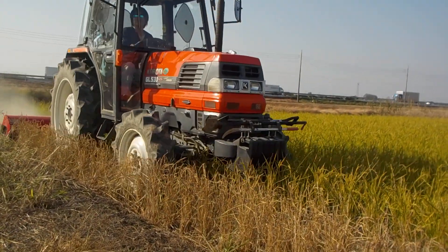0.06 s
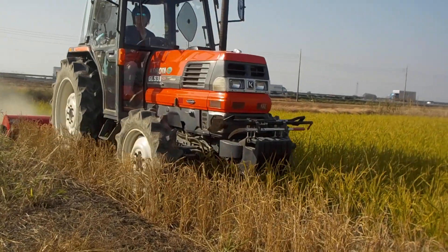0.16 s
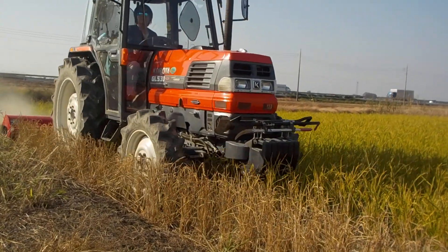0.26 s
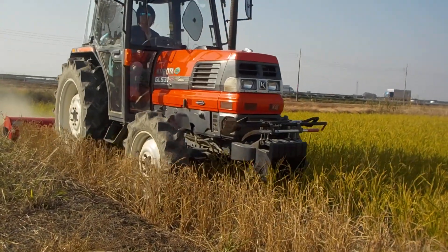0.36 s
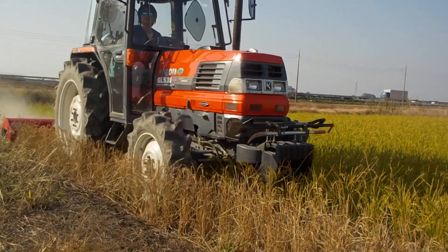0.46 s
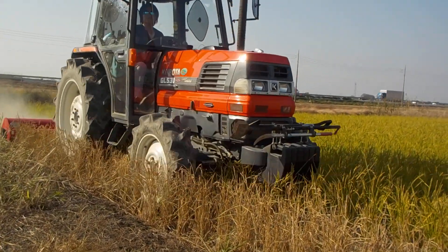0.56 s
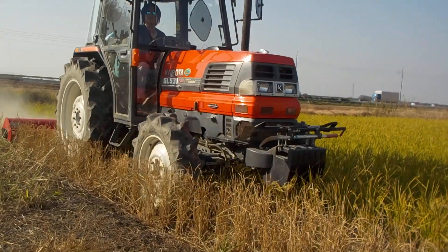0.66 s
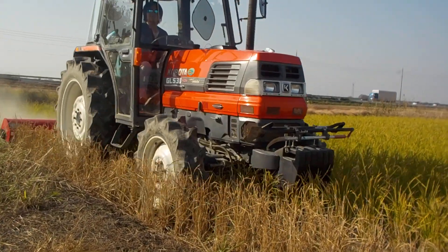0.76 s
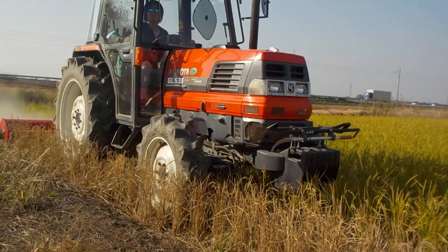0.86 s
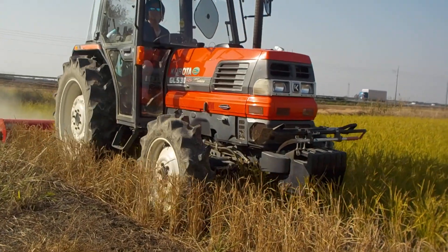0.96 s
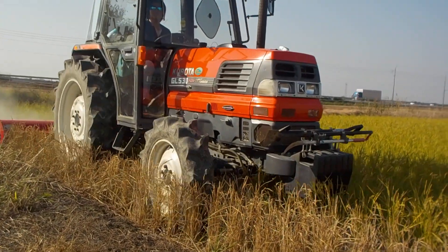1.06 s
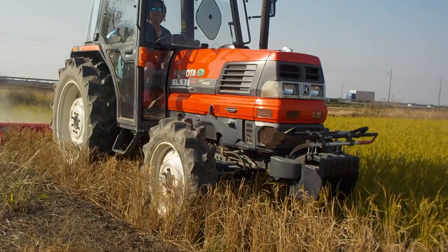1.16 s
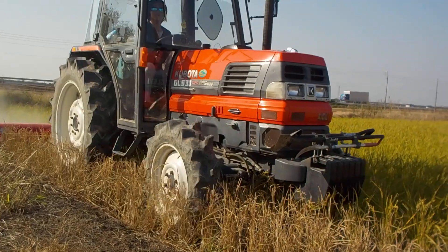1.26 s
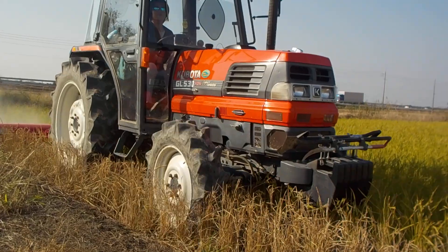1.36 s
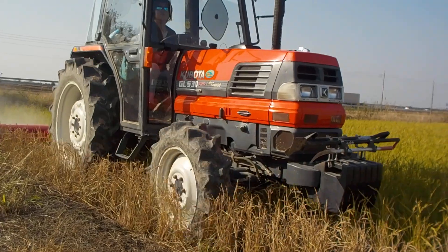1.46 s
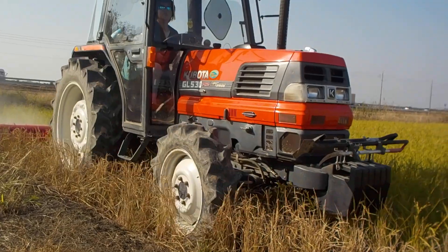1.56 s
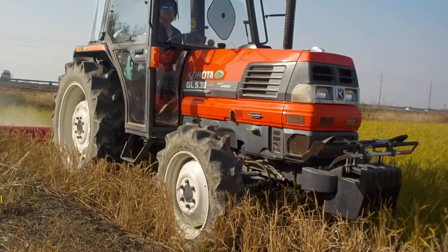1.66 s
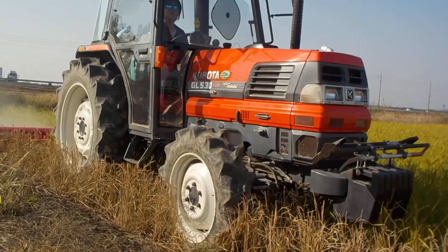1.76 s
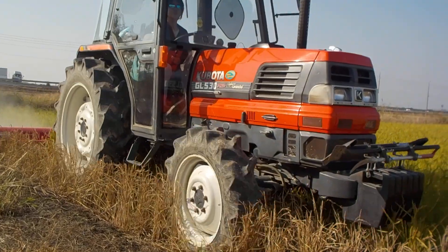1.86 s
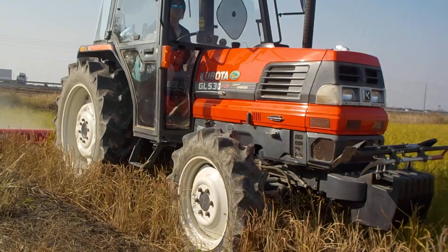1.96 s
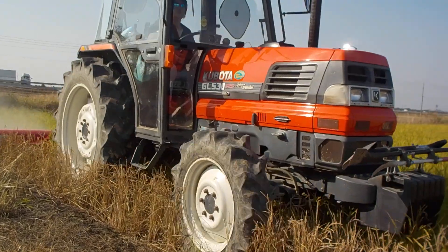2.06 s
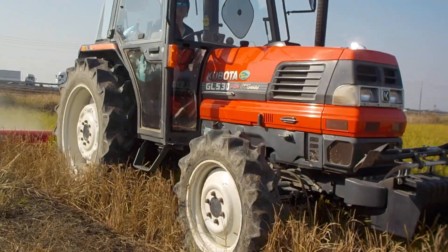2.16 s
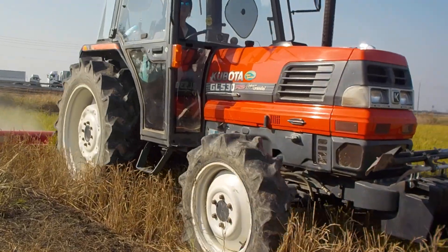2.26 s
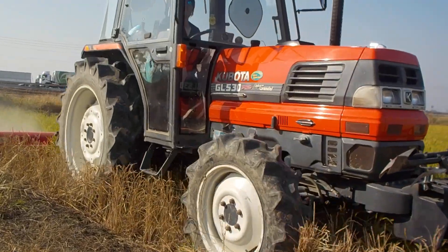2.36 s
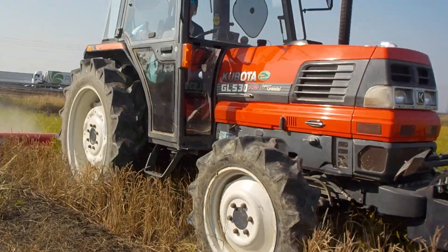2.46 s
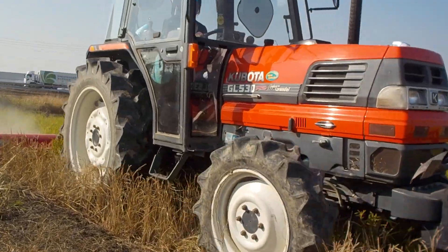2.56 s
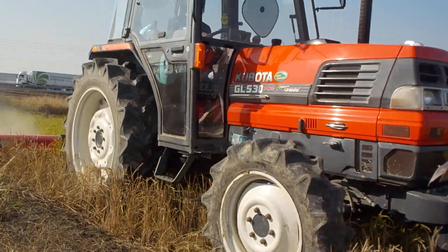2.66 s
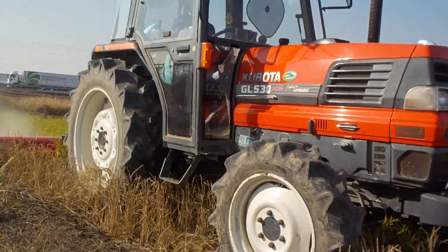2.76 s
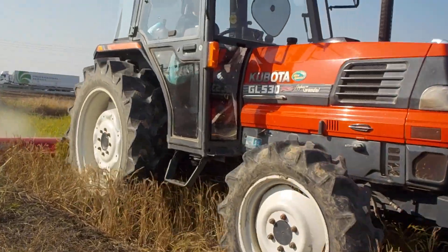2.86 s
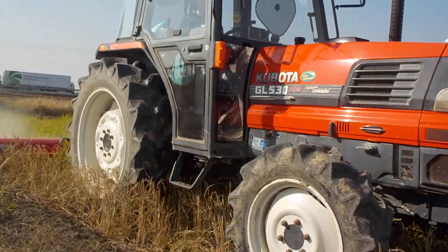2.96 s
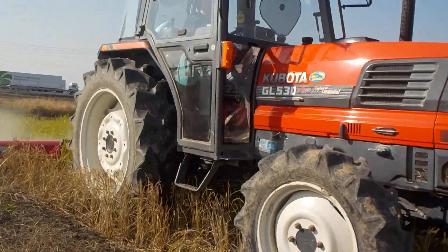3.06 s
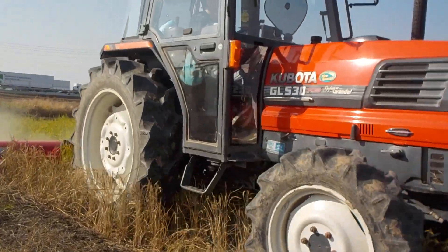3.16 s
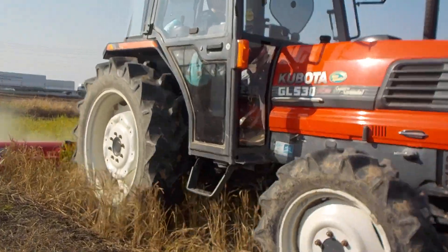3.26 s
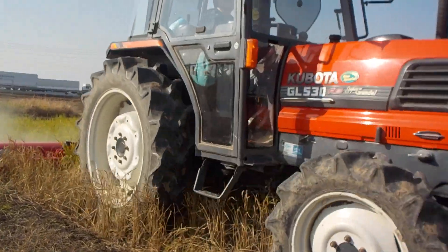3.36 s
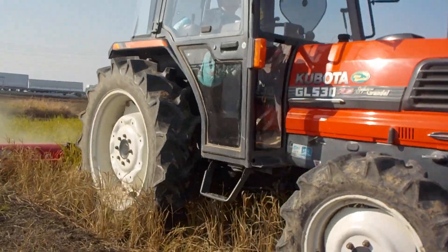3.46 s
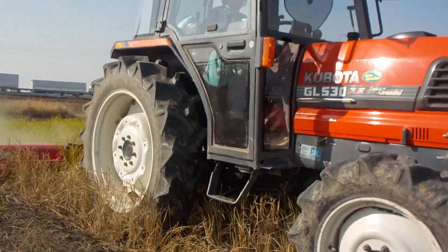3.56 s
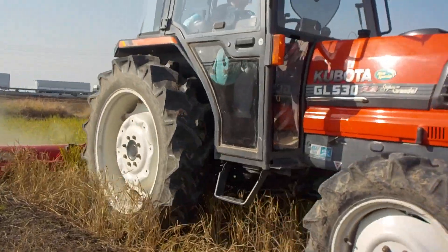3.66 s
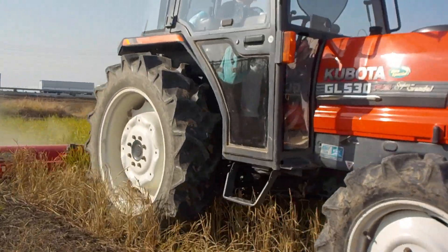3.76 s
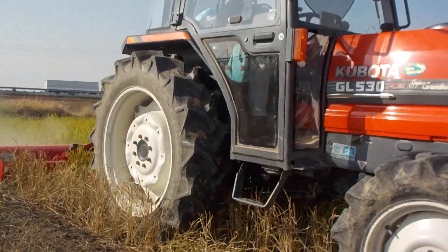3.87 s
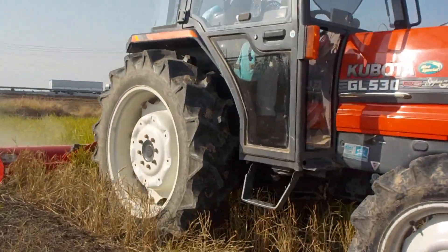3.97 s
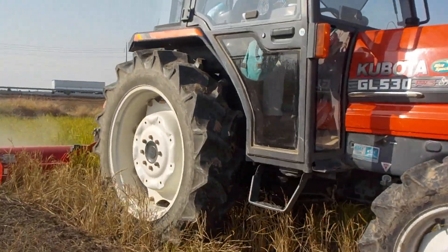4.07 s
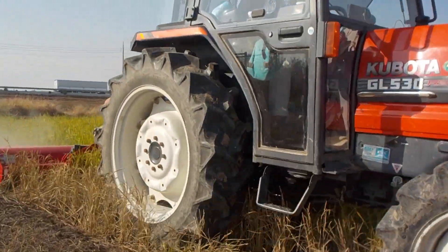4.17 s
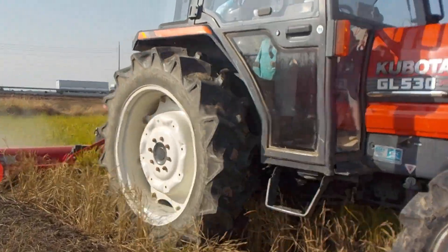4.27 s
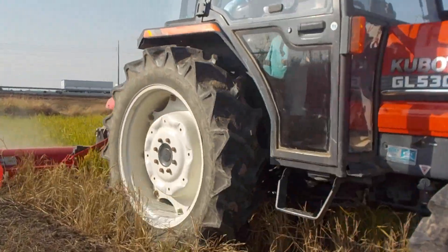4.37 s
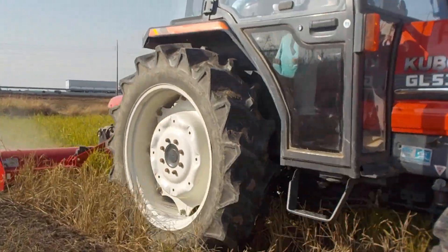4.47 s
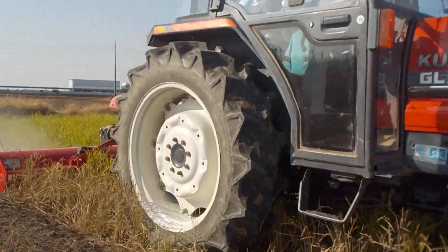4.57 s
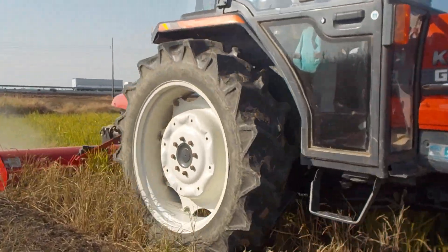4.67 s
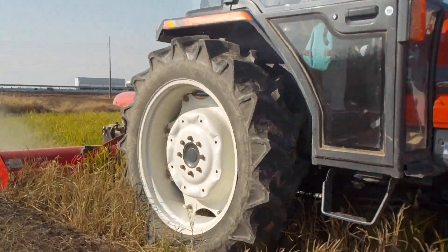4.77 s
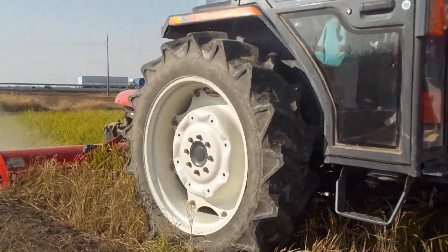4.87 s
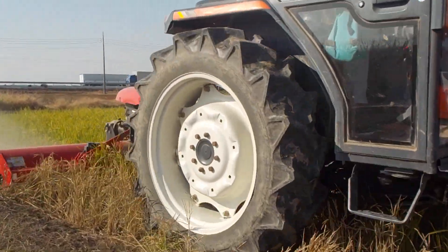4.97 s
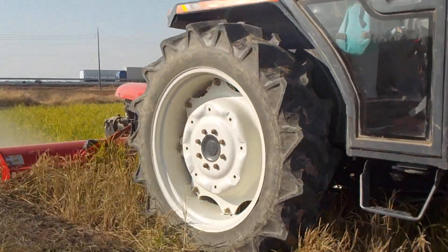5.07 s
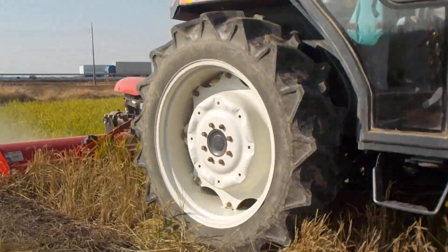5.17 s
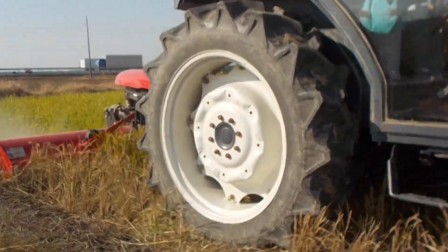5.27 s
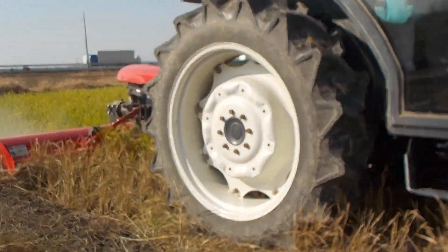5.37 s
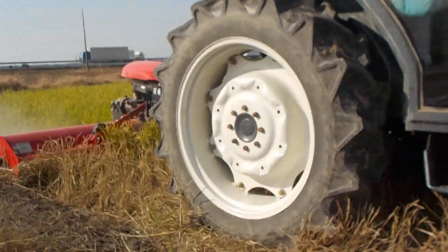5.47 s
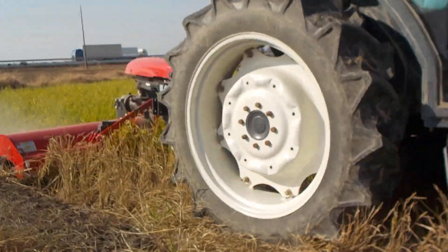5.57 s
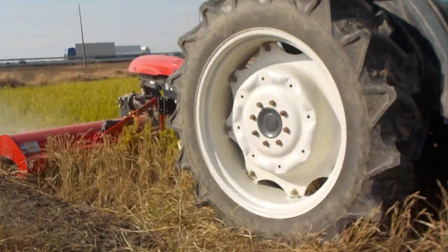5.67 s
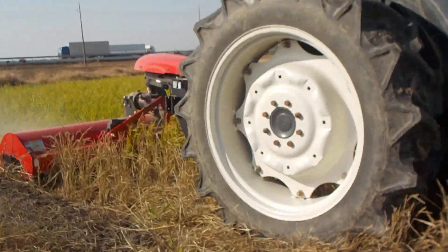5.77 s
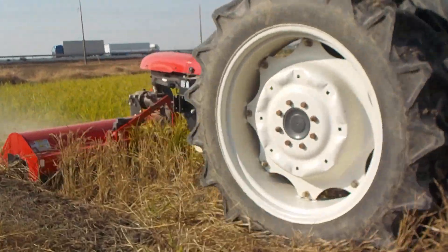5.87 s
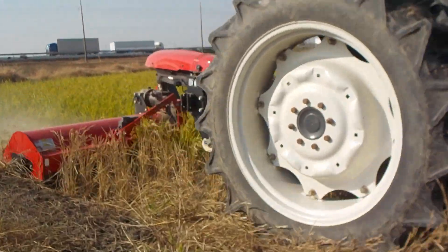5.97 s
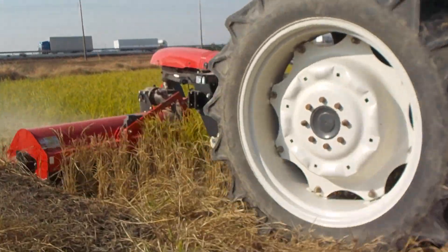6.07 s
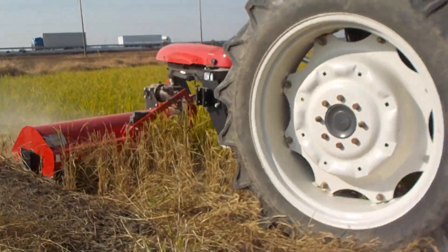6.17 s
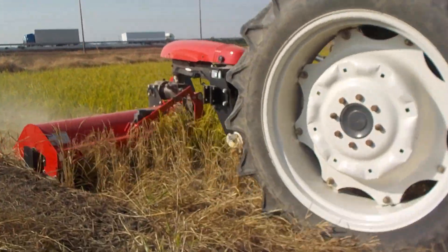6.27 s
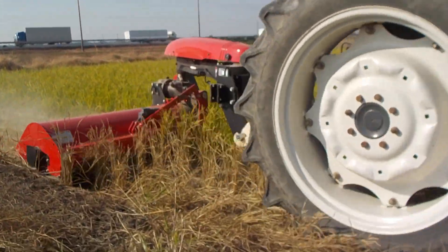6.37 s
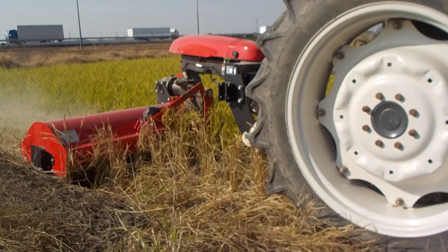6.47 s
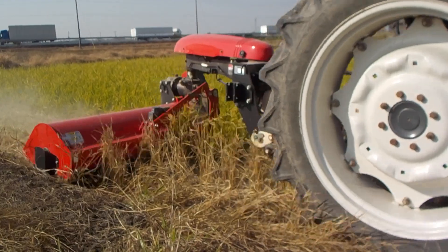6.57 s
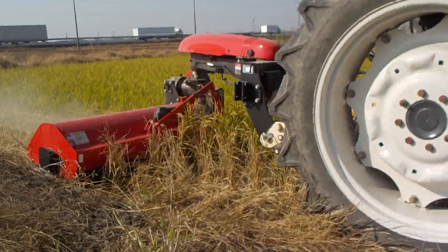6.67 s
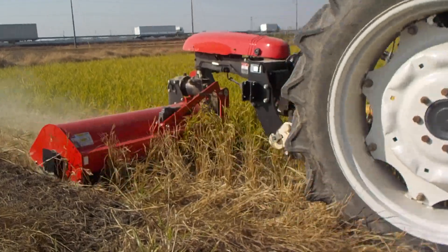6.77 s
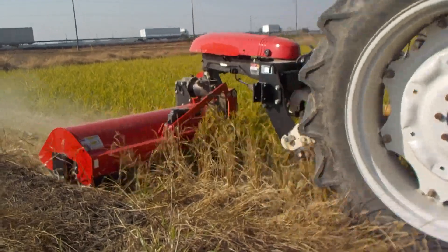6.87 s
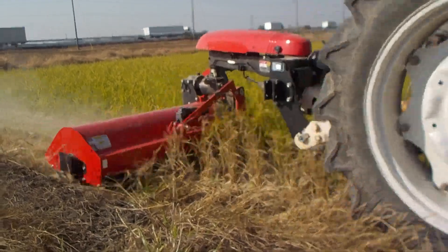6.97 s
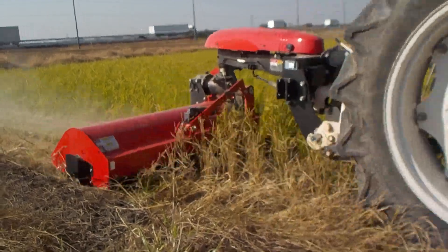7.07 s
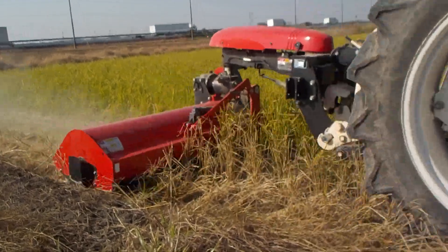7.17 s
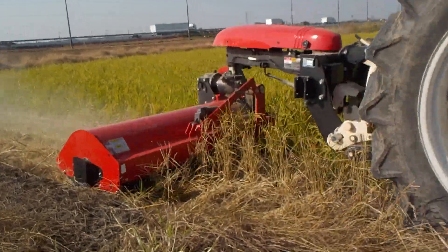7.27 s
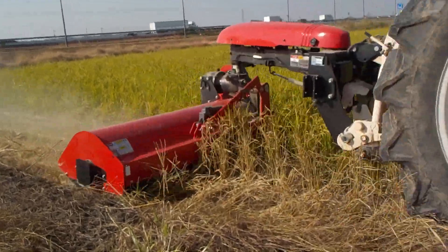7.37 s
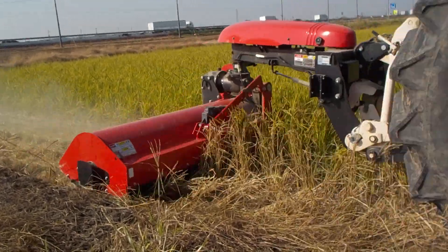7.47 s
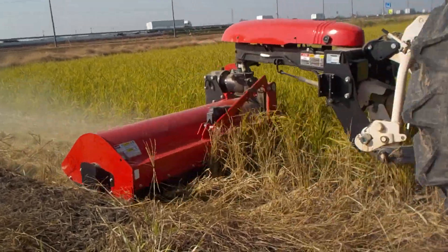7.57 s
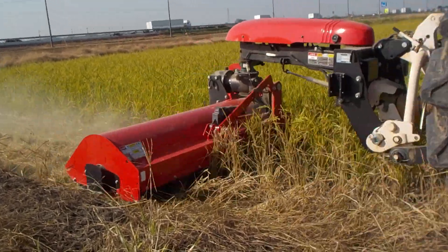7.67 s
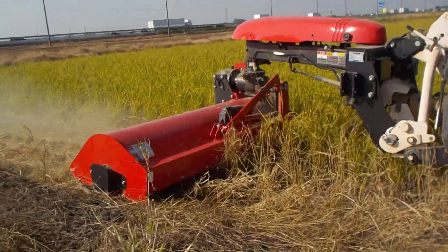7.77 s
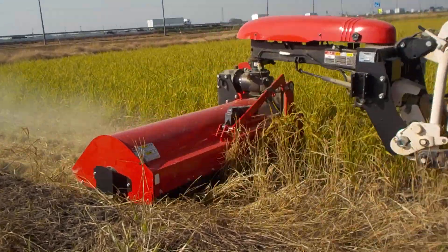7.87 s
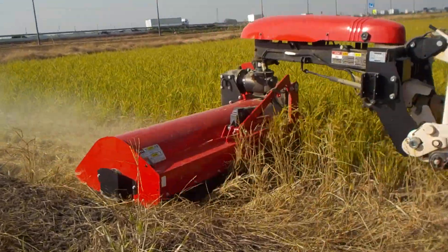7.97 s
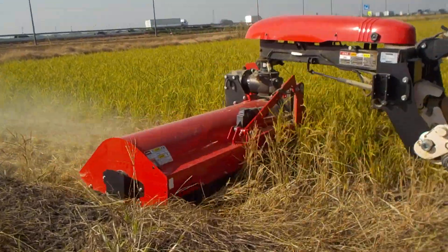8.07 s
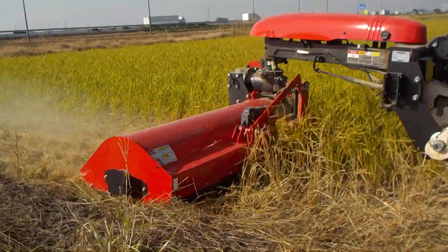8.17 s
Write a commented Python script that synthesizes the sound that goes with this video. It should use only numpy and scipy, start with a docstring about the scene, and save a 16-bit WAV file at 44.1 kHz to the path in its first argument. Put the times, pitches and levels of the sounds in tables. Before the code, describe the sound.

A diesel tractor drives slowly toward the microphone across a field, its engine clattering with faint fan and gear tones. As it passes, the flail mower behind it takes over with a rushing roar, a low hum and the crackle of dry stalks being chopped. A steady high whine rides over all the cutting noise. The sound grows louder, then holds close by, dotted with sharp cracks.

```python
"""Tractor mowing dry stalks

A five-cylinder diesel tractor drives past, towing a flail mower through dry crop. Injection clatter
and fan whine give way to the rotor's hum, the roar of air and chaff under its hood and the crackle
of snapping stalks. A sharp resonance of the microphone housing turns all the crackle into a high
whine, and hard strikes duck a limiter."""
import sys
import numpy as np
from scipy import signal
from scipy.fft import rfft, irfft, next_fast_len
from scipy.io import wavfile
from scipy.ndimage import minimum_filter1d, map_coordinates

SR = 44100
rng = np.random.default_rng(int(sys.argv[2]) if len(sys.argv) > 2 else 0)


def bounce(signal):
    """Save signal as a 16-bit WAV file at the path given by the first command-line argument."""
    frames = np.transpose(np.atleast_2d(signal))
    limited = np.clip(frames, -1, 1)
    pcm = np.round(limited * 32767).astype(np.int16)
    wavfile.write(sys.argv[1], SR, pcm)


N = 362943

# Loud cracks of flails on tough stalks and clods, each with a thin high click. # Each row: start in seconds,
# click in relative dB, crack in relative dB.
HARD_STRIKES = [(4.366, -40, -14), (4.5346, -34, -15.5), (4.57, -26, -14), (4.597, -31, -15),
                (4.8988, -25, -19), (5.0824, -36, -19), (5.3213, -27, -16), (5.3495, -35, -14),
                (5.3762, -57, -18), (5.4054, -47, -16.5), (5.4323, -32, -11.5), (5.4595, -41, -22),
                (5.4869, -30, -10.5), (5.515, -31, -13.5), (5.677, -39, -17), (5.7402, -34, -18),
                (5.7675, -44, -16), (5.7962, -24, -14.5), (5.9364, -40, -22), (5.9638, -30, -14.5),
                (5.9928, -33, -12), (6.0482, -38, -10), (6.127, -35, -15), (6.2093, -33, -16),
                (6.3298, -27, -11.5), (6.4228, -35, -16.5), (6.484, -27, -12), (6.6348, -37, -16.5),
                (6.7914, -33, -13), (6.8344, -46, -15), (6.8743, -38, -16), (6.9995, -33, -17),
                (7.0404, -35, -16), (7.1004, -26, -13), (7.262, -29, -16), (7.379, -32, -13.5),
                (7.401, -33, -14.5), (7.5418, -31, -16), (7.598, -27, -10.5), (7.6585, -26, -15),
                (7.7698, -34, -18), (7.8825, -31, -14.5), (8.0152, -28, -14), (8.1554, -30, -13),
                (8.2115, -42, -14)]
# The clearest snaps of thin stalks. Each row: start in seconds, level in relative dB.
STALK_SNAPS = [(0.1005, -19), (0.9895, -22), (1.5195, -21), (1.5735, -23), (2.3155, -17), (2.5945, -20),
               (2.8465, -19), (2.9015, -16), (2.9565, -15), (2.9845, -18), (3.0995, -17), (3.1405, -18),
               (4.0085, -15), (4.0365, -15), (4.8715, -15), (5.1095, -13.5), (5.124, -10.5), (5.2215, -14),
               (5.2615, -16), (5.2755, -10), (6.5385, -16), (6.6215, -19), (6.9025, -16)]
# Thick tufts load the rotor, thin patches ease it. Each row: time in seconds, extra roar in dB,
# extra crackle in dB.
CROP_TUFTS = [(3.65, -0.5, -0.5), (4.27, 2, 2), (4.58, 1.8, 0.5), (4.76, 1, -0.8), (5.17, 2, 1),
              (5.75, 2.5, 1.5), (6.42, 1.4, 0.5), (6.68, -0.7, 1), (7.55, 1, 0.4), (7.98, 0.5, 0)]
# The knocks of one engine cycle. Each entry: relative strength, nearest cylinder first.
CYLINDER_FORCES = [1.74, 1.12, 1.22, 0.99, 1.14]
# Short, dull clacks from the machine. Each row: start in seconds, level in relative dB.
MACHINE_CLACKS = [(0.705, -18), (1.792, -13.5), (1.92, -13), (2.001, -16), (2.3025, -14), (2.3695, -16),
                  (2.877, -14.5), (2.886, -12), (3.086, -19), (3.211, -14), (3.5388, -12), (3.7566, -12),
                  (4.207, -11), (4.515, -9)]
# Colour of the roar under the mower's hood. Each row: frequency in Hz, level in relative dB.
HOOD_COLOUR = [(25, -51), (60, -41), (120, -24.5), (200, -15.5), (330, -12.5), (410, -4.5), (600, 2.5),
               (750, -1), (880, 2), (1200, 0.5), (1600, -0.5), (1900, -9), (2150, -8), (2600, -9.5),
               (6000, -35.5)]
# Colour of the engine at the bonnet. Each row: frequency in Hz, level in relative dB.
BONNET_COLOUR = [(25, -47), (60, -41), (120, -32.5), (200, -15.5), (330, -12), (420, -4), (650, -1.5),
                 (725, -3), (790, 1.5), (880, 2.2), (1050, -3), (1200, -2.5), (1360, -6.5), (1600, -1.5),
                 (1800, -11), (2100, -12), (2600, -11), (6000, -32)]
# The exhaust note. Each row: multiple of the four-stroke cycle rate, level in dB.
EXHAUST_PARTIALS = [(5, -78.5), (10, -68.5), (15, -66), (20, -62.5)]
# The rotor's hum. Each row: multiple of the rotation rate, level in relative dB.
HUM_PARTIALS = [(3, -73), (4, -57.5)]
# Fan, gear and panel tones, each loudest as its part faces us. Each row: pitch in Hz, level in dB,
# peak time in seconds, half length in seconds, glide in Hz per second.
PASSING_WHINES = [(698.4, -43, 1.347, 1.65, -3), (650, -47, 2.714, 2.1, -1), (627, -51, 1.8, 1.6, 0),
                  (542, -49, 3.18, 0.79, -0.5), (792, -49.5, 1.8, 0.67, -2), (906, -52, 1.32, 0.93, -3),
                  (1082, -48, 1.2, 0.7, -3), (1165, -51.5, 2.7, 0.9, -3), (1477, -46.5, 1.007, 0.8, -8),
                  (1550, -51.5, 0.606, 1.0, -4.5), (1660, -49.5, 3.8, 0.9, 0.5),
                  (1877, -50.5, 4.6, 1.3, 0.5), (288.8, -60, 0.99, 2.3, 0), (286, -57.5, 6.9, 1.36, 0),
                  (250, -59, 5.45, 0.53, 0), (417, -54.5, 1.0, 2.7, 0), (415.5, -45, 6.0, 0.9, 0),
                  (416, -45, 8.18, 0.36, 0.5), (642, -46.5, 5.3, 0.57, 0), (695, -46, 5.6, 0.66, 0),
                  (835, -45, 5.2, 0.72, -1), (911, -41, 5.64, 0.29, -0.5), (591, -44.5, 6.6, 0.3, 1.5),
                  (596, -39, 7.82, 0.36, 0), (958, -45, 6.9, 0.55, 0), (1567, -48.5, 6.5, 0.5, 1),
                  (817, -43.5, 7.05, 0.2, 0), (900, -44.5, 7.9, 0.5, -2), (1300, -42, 7.93, 0.49, -4),
                  (1455, -46, 7.9, 0.6, 0), (1650, -48, 8.2, 0.5, 0)]
# Stereo width of the noisy layers. Each row: frequency in Hz, gain of the side signal in dB.
STEREO_WIDTH = [(60, -6), (280, -18.5), (650, -24), (1000, -23.5), (1900, -13), (2500, -33), (3400, -12.5),
                (4300, -11.5), (6500, -12.5), (11000, -7)]
# Colour of the microphone housing. Each row: frequency in Hz, gain in dB.
HOUSING_COLOUR = [(2000, 1), (2250, -14.5), (2430, -29), (2750, -12.5), (3000, -17), (3350, 3), (3800, 13),
                  (4800, 13), (5500, 8), (7100, 7.5), (7500, -5.5), (7950, -33), (8450, -29), (9200, -30.5),
                  (12000, -24.5), (14200, -33), (15500, -33.5)]
# Air resonances in the housing. Each row: centre in Hz, width in Hz, boost in dB.
HOUSING_PEAKS = [(4147, 577, 13), (10850, 1960, 15.5)]
# The two microphone ports differ in level. Each row: frequency in Hz, left minus right in dB.
PORT_BALANCE = [(60, 0), (290, -2), (380, 0), (1600, -0.5), (3400, 0), (3850, 1.9), (4300, -3), (5500, 1.5),
                (6800, 2.5), (7500, -0.5), (9200, -1), (10300, 5), (12000, -2.5), (15500, 0)]
# They differ in phase too. Each row: frequency in Hz, lead of the left port in radians.
PORT_PHASE = [(100, 0.098), (300, -0.39), (500, -0.018), (3600, -0.054), (4050, 0.21), (4700, -0.36),
              (6300, -0.56), (7000, 0.28), (9700, -0.38), (14000, -0.46)]

CYCLE_HZ, ROTOR_HZ = 15.49, 35.68  # four-stroke cycles and rotor turns a second
SPEED_M_PER_S, LANE_M, NEAREST_S = 0.84, 2.76, 7.19  # the drive past: pace, closest distance, its moment


def flails(turn, stalks_per_s=3200):
    """Four rows of flails sweep the crop each turn; every stalk they meet snaps with its own force."""
    rows = blows(turn, [1.3, 1.0, 0.76, 0.94], decay=1.05)
    hits = rng.random(N) < stalks_per_s / SR * rows ** 2
    force = amp(1.25 * rng.standard_normal(N))
    feed = amp(0.57 * wobble(60))  # the crop comes in tufts
    cuts = unit(noise() * hits * force)
    return unit(feed * (cuts + 0.89 * noise()))


def strikes(share, snap_s=0.0013):
    """Each strike splinters around one sharp snap; light ones fall at random once the mower is near."""
    cracks, clicks = np.zeros((2, 2, N + SR))
    t = np.arange(SR // 50) / SR
    light_per_s = 13 * share ** 4 / distance() ** 2
    moments = np.flatnonzero(rng.random(N) < light_per_s / SR) / SR
    softer_db = 4 * rng.standard_normal(len(moments))
    light_strikes = [(s, -46 - db, -28 - db) for s, db in zip(moments, softer_db)]
    burst = np.sin(np.pi * np.minimum(t / (2 * snap_s), 1))
    for s, click_db, crack_db in list(HARD_STRIKES) + light_strikes:
        splinters = rng.standard_normal((2, len(t))) * burst / np.linalg.norm(burst)
        snap = 0.16 * splinters
        snap[0, round(snap_s * SR / 2)] += 1
        add_at(cracks, s, amp(crack_db + 12.5) * snap)
        add_at(clicks, s, amp(click_db + 43) * (snap + 0.44 * splinters))
    body = filtered(cracks[:, :N], lambda hz: low_cut(hz, 2900, 4))  # brittle and thin
    # a thin high click is laid on each crack
    edge = filtered(clicks[:, :N], lambda hz: 1 / (1 + np.exp((12600 - hz) / 600)))
    return body + edge


def low_flail(rotor_turn, crackle_db, place_in_turn=0.73, break_s=0.0033):
    """One low-hanging flail clips stalks once a turn: thin, bright snaps in runs, a few standing out."""
    snaps, t = np.zeros((2, N + SR)), np.arange(SR // 100) / SR
    passes = np.flatnonzero(np.diff(np.floor(rotor_turn - place_in_turn)) > 0)
    clump_db = crackle_db + 8 + 3.5 * wobble(6)
    force_db = clump_db[passes] + 1.5 * rng.standard_normal(len(passes))
    burst = np.sin(np.pi * np.minimum(t / break_s, 1))
    for s, db in list(STALK_SNAPS) + list(zip(passes / SR, force_db)):
        add_at(snaps, s, amp(db) * burst * rng.standard_normal((2, len(t))))
    return filtered(snaps[:, :N], lambda hz: low_cut(hz, 7300, 2) * high_cut(hz, 13800, 10))


def hood_sparkle(crackle, lift_db=1.5):
    """The hood's mouth beams out treble, brightening the crackle while it faces us."""
    treble = filtered(crackle, lambda hz: low_cut(hz, 4800, 12))
    return crackle + (amp(lift_db * swell(5.6, 0.74)) - 1) * treble


def engine_clatter(turn, scatter_db=0.4, top_db=1.8):
    """Injection clatter: five knocks a cycle, each with its own force, the nearest cylinder loudest."""
    knocks = blows(turn, CYLINDER_FORCES, decay=4)
    firing = np.floor(turn * len(CYLINDER_FORCES)).astype(int)
    force = amp(scatter_db * rng.standard_normal(firing.max() + 1))[firing]
    grain = amp(0.9 * wobble(700))
    clatter = unit(noise() * knocks * force * grain)
    return filtered(clatter, lambda hz: amp(top_db * low_cut(hz, 8000, 8)))  # steel outshines straw


def machine_clacks(ring_s=0.024):
    """Now and then a short, dull clack comes from the machine."""
    clacks, t = np.zeros((2, N)), np.arange(SR // 40) / SR
    for s, db in MACHINE_CLACKS:
        clack = 0.097 * rng.standard_normal((2, len(t))) * amp(-60 * t / ring_s)
        clack[0, 0] += 1
        add_at(clacks, s, amp(db + 7) * clack)
    return filtered(clacks, lambda hz: low_cut(hz, 3100, 6) * high_cut(hz, 5500, 6))


def roar(share, engine_turn):
    """The engine's throbbing body crossfades into the churn of air and chaff under the hood."""
    throb = 1 + 0.04 * np.cos(2 * np.pi * engine_turn)
    bonnet = unit(filtered(noise(), lambda hz: amp(along(BONNET_COLOUR, hz)))) * throb
    bonnet *= amp([[0], [-4]])  # the engine lies ahead, so it is narrower
    hood = unit(filtered(noise(), lambda hz: amp(along(HOOD_COLOUR, hz)))) * amp(wobble(14))
    return crossfade(bonnet, hood, share)


def exhaust(turn):
    """Firing pulses make a low, gently wavering exhaust note."""
    return sum(amp(db) * tone(k * turn, waver_db=1.5, drift_turns=0.04) for k, db in EXHAUST_PARTIALS)


def rotor_hum(share, turn):
    """The spinning rotor hums, dipping while the rear tyre screens it."""
    hum = sum(amp(db) * tone(k * turn, waver_db=2, drift_turns=0.066) for k, db in HUM_PARTIALS)
    tyre_db = -3.5 * swell(6.4, 0.47)
    return np.sqrt(share) * amp(tyre_db) * hum


def whines(share):
    """Fan, gear and panel tones swell as they pass and flutter under the crop's load."""
    t, load, mix = clock(), np.sqrt(share), np.zeros(N)
    for hz, db, peak_s, half_s, glide in PASSING_WHINES:
        turn = hz * t + glide * (t - peak_s) ** 2 / 2
        whine = tone(turn, waver_db=4.5 * load, drift_turns=0.125 * load, rate=28)
        mix += amp(db) * swell(peak_s, half_s) * whine
    return mix


def distance():
    """How far away the machine is, as a multiple of its closest distance."""
    return np.hypot(LANE_M, SPEED_M_PER_S * (clock() - NEAREST_S)) / LANE_M


def mower_share(before=0.073, after=0.89, handover_s=3.3, ease_s=0.72):
    """The mower's share of the power grows smoothly as the bonnet goes by."""
    return before + (after - before) / (1 + np.exp((handover_s - clock()) / ease_s))


def faders(tuft_half_s=0.079):
    """Roar and crackle gains in dB: both rise as the machine nears and swell with each tuft."""
    decades = np.log10(distance())
    grille_db = swell(2.38, 1)  # a 1 dB lift as the engine's side grille faces us
    roar_db = -31 - 13 * decades + grille_db
    crackle_db = -28 - 33 * decades + grille_db  # steeper: the standing crop shades the treble
    for s, extra_roar_db, extra_crackle_db in CROP_TUFTS:
        tuft = swell(s, tuft_half_s)
        roar_db += extra_roar_db * tuft
        crackle_db += extra_crackle_db * tuft
    return roar_db, crackle_db


def housing(x, size=4096):
    """The microphone housing, as a minimum-phase filter, rings after each click."""
    hz = np.fft.rfftfreq(size, 1 / SR)
    peaks_db = sum(db / (1 + (2 * (hz - centre) / width) ** 2) for centre, width, db in HOUSING_PEAKS)
    cepstrum = irfft(np.log(amp(along(HOUSING_COLOUR, hz) + peaks_db)))
    cepstrum[1:size // 2] *= 2
    cepstrum[size // 2 + 1:] = 0
    ring = irfft(np.exp(rfft(cepstrum)))
    return signal.fftconvolve(x, ring[None], axes=1)[:, :N]


def ports(hz):
    """Complex gains of the two unequal microphone ports, left and right."""
    half = np.array([[0.5], [-0.5]])
    return amp(half * along(PORT_BALANCE, hz)) * np.exp(1j * half * along(PORT_PHASE, hz))


def limiter(x, ceiling_db=-6.5, attack_s=0.00025, hold_s=0.015, release_db_per_s=220):
    """Peaks above the ceiling duck the gain a moment later; it holds briefly, then recovers fast."""
    over_db = np.maximum(20 * np.log10(np.abs(x).max(axis=0) + 1e-9) - ceiling_db, 0)
    reach = int(hold_s * SR / 2)
    over_db = -minimum_filter1d(-over_db, 2 * reach + 1, origin=reach)
    recovery = release_db_per_s * clock()
    held_db = np.maximum.accumulate(over_db + recovery) - recovery
    pole = np.exp(-1 / (attack_s * SR))
    return x * amp(-signal.lfilter([1 - pole], [1, -pole], held_db))


def saturate(x, top=0.59, knee=13):
    """Peaks near the top are rounded off, which throws overtones into the high treble."""
    return x / (1 + np.abs(x / top) ** knee) ** (1 / knee)


def blows(turn, sizes, decay):
    """An envelope of rms 1: evenly spaced blows in each turn, their decay counted in spacings."""
    place = turn * len(sizes)
    size = np.asarray(sizes)[np.floor(place).astype(int) % len(sizes)]
    return unit(size * np.exp(-(place % 1) / decay))


def tone(turn, waver_db, drift_turns, rate=13):
    """A sine of rms 1 that wavers in level, rate times a second, and more slowly in phase."""
    level = amp(waver_db * wobble(rate))
    drift = drift_turns * wobble(0.7 * rate)
    return unit(level * np.sin(2 * np.pi * (turn + drift)))


def noise():
    """Two unrelated white noises: mid and side."""
    return rng.standard_normal((2, N))


def wobble(rate):
    """A smooth random curve, rate knots a second."""
    knots = rng.standard_normal(int(N * rate / SR) + 4)
    steps = np.arange(10 * len(knots)) / 10
    return np.interp(clock() * rate, steps, map_coordinates(knots, [steps]))


def swell(peak_s, half_s):
    """A bell-shaped rise and fall that reaches 1 at peak_s."""
    return np.exp(-((clock() - peak_s) / half_s) ** 2 / 2)


def crossfade(a, b, share):
    """An equal-power blend from a (share 0) to b (share 1)."""
    return np.sqrt(1 - share) * a + np.sqrt(share) * b


def add_at(track, start_s, sound):
    """Drop a short sound onto a two-channel track."""
    start = round(start_s * SR)
    track[:, start:start + sound.shape[1]] += sound


def filtered(x, gain):
    """x times a gain that depends on frequency."""
    size = next_fast_len(N + SR // 4)
    return irfft(rfft(x, size) * gain(np.fft.rfftfreq(size, 1 / SR)), size)[..., :N]


def low_cut(hz, corner_hz, order):
    """A gain that rolls off below the corner."""
    return hz ** order / (hz ** order + corner_hz ** order)


def high_cut(hz, corner_hz, order):
    """A gain that rolls off above the corner."""
    return 1 / (1 + (hz / corner_hz) ** order)


def along(points, hz):
    """A curve through (Hz, value) points on a log axis."""
    freqs, values = np.transpose(points)
    return np.interp(np.log(hz + 1), np.log(freqs + 1), values)


def amp(db):
    """Decibels to gain."""
    return 10 ** (np.asarray(db) / 20)


def unit(x):
    """x scaled to rms 1."""
    return x / np.sqrt(np.mean(x ** 2) + 1e-20)


def clock():
    """The time of every sample, in seconds."""
    return np.arange(N) / SR


def scene():
    """The pass-by, mixed as mid and side with the tones in the centre, then spread to left and right."""
    roar_db, crackle_db = faders()
    share = mower_share()
    engine_turn = CYCLE_HZ * clock() + 0.245 + 0.016 * wobble(2)
    rotor_turn = ROTOR_HZ * clock() + 0.2 + 0.02 * wobble(2)
    crackle = amp(crackle_db) * crossfade(engine_clatter(engine_turn), flails(rotor_turn), share)
    bright = hood_sparkle(crackle) + machine_clacks() + strikes(share)
    bright += low_flail(rotor_turn, crackle_db)
    bright = filtered(bright, lambda hz: low_cut(hz, 700, 2))  # thin stalks radiate little bass
    mid, side = bright + amp(roar_db) * roar(share, engine_turn)
    mid = mid + exhaust(engine_turn) + rotor_hum(share, rotor_turn) + whines(share)
    side = filtered(side, lambda hz: amp(along(STEREO_WIDTH, hz)))
    return np.array([mid + side, mid - side])


def record(dry, top_hz=15830):
    """Ringing housing, unequal ports, limiter, saturation of what slips past it, and band limits."""
    coloured = filtered(housing(dry), ports)
    squeezed = saturate(limiter(coloured))
    return filtered(squeezed, lambda hz: (hz < top_hz) * low_cut(hz, 35, 2))


dry = scene()
out = record(dry)
bounce(out)
```